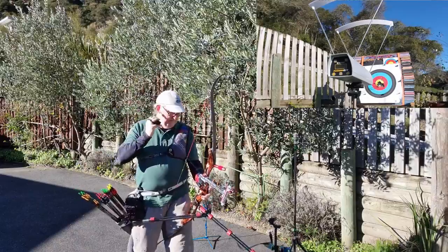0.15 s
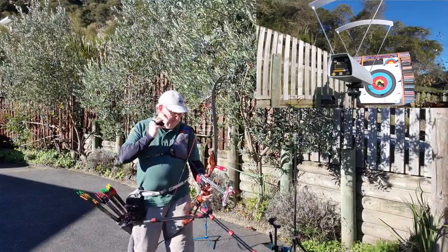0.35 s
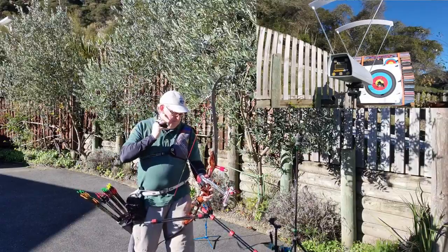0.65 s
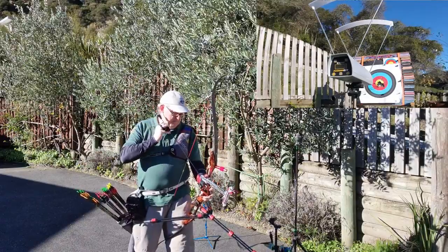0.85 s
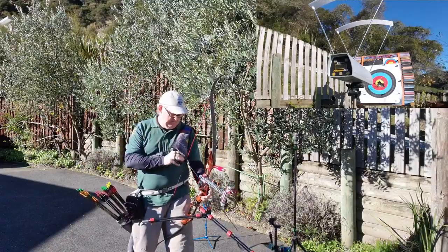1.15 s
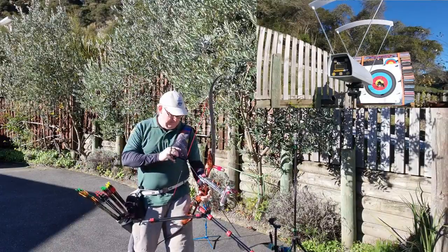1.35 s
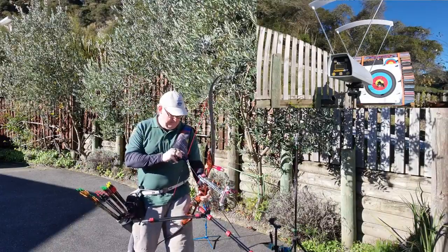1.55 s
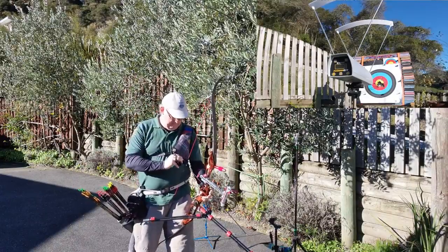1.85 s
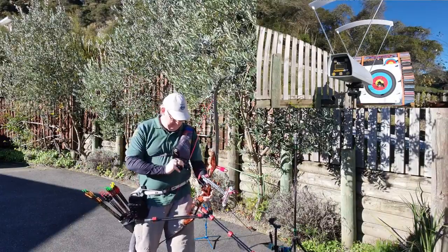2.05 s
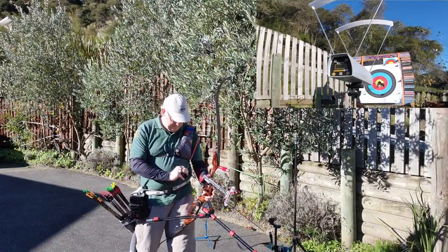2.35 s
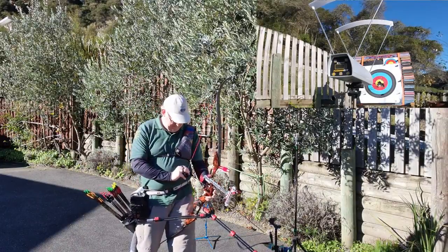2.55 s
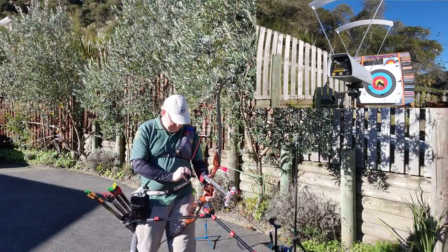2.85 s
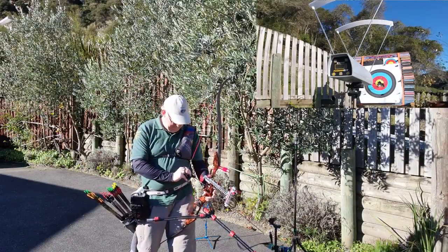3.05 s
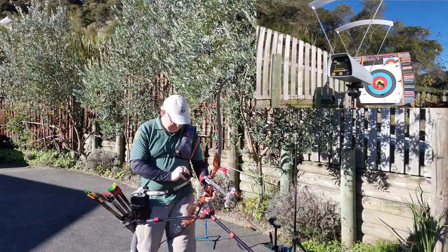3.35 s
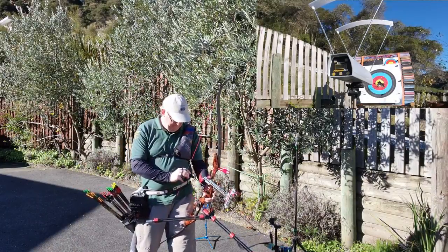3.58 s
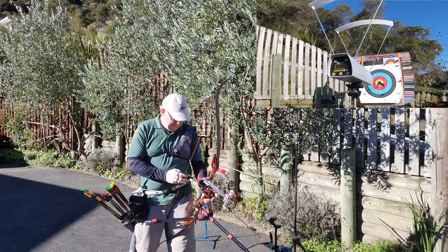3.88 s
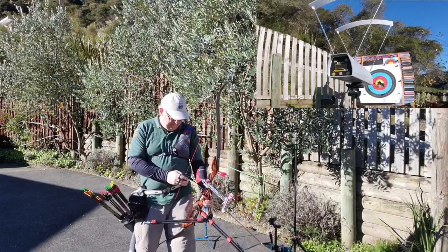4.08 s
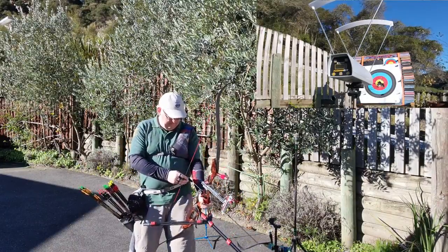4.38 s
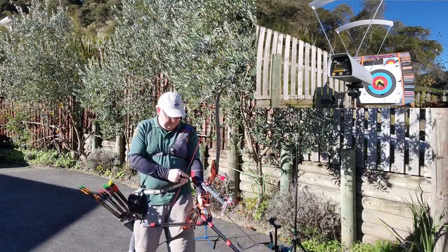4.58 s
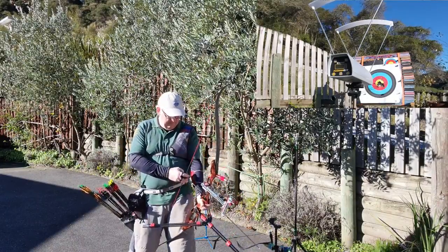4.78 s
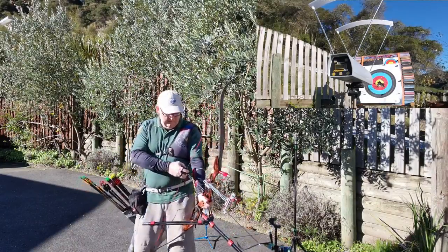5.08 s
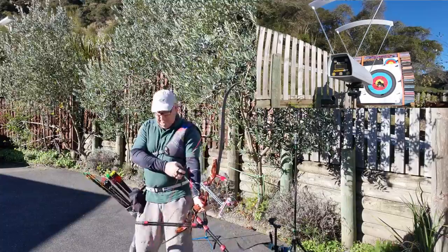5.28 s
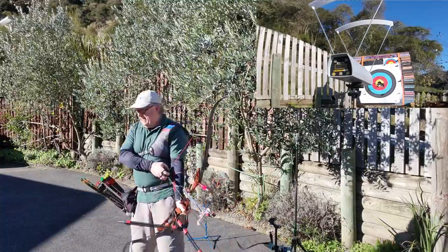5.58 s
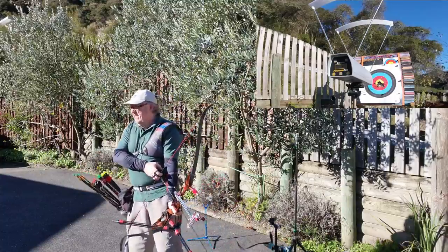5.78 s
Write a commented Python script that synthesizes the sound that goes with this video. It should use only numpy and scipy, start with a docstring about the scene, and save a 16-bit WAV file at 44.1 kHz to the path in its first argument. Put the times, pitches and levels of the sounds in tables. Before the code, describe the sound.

Low wind gusts thump against the microphone for the first second, dying down by about 1.6 seconds. From 0.4 to 1.4 seconds an arrow taps lightly against a bow, most clearly at 0.6 seconds. Between 0.8 and 1.3 seconds it slides over its rest with a fine scrape and thin, high squeaks. A quiet stretch follows. At 3.3 seconds the arrow snaps onto the string with one sharp click, the loudest moment, and the bow rings briefly. A tiny tap comes near 3.9 seconds. Around 5 seconds the bow rubs and bumps the quiver with a short hollow rattle, followed by light gear knocks and faint sleeve rustle until about 5.8 seconds. Soft outdoor air, a faint high insect hiss and a distant low engine hum continue throughout. Far birds whistle thinly near 1.5 seconds, between 3.5 and 4.3, and at 5.8.

```python
"""Loading a bow in a fenced driveway.

An arrow taps the bow, then slides over its rest with thin stick-slip squeaks. The nock snaps onto
the string and the bow rings. Sleeves rustle and gear knocks softly as the archer shifts his grip.
Gusts buffet the microphone, insects hiss in the trees, a far engine hums and far birds whistle."""
import sys
import numpy as np
from scipy import signal
from scipy.fft import rfft, irfft, next_fast_len
from scipy.io import wavfile
from scipy.ndimage import map_coordinates

SR = 44100
rng = np.random.default_rng(int(sys.argv[2]) if len(sys.argv) > 2 else 0)


def put_to_file(sound):
    """Save the sound as 16-bit audio at rate SR, in the file named by the first command-line argument."""
    columns = np.atleast_2d(sound).T  # one column per channel
    safe = np.clip(columns, -1, 1)
    whole_steps = np.round(safe * 32767)
    wavfile.write(sys.argv[1], SR, whole_steps.astype(np.int16))


N = 261072

# outdoor air spectrum: (frequency [Hz], gain [dB])
AIR_COLOUR = [(100, 4), (180, -3), (290, -3), (390, 2), (550, -2.5), (1000, -5.5), (2000, -12.5),
              (3700, -16), (4300, -22), (6000, -26), (10000, -30.5), (15500, -30.5)]
# stereo image of the air: (frequency [Hz], left-right correlation [1])
AIR_CORRELATION = [(150, 0.72), (400, 0.4), (1000, 0), (3000, 0), (8000, 0)]
# insect chorus spectrum: (frequency [Hz], gain [dB])
INSECT_COLOUR = [(5000, -65), (6100, -16.5), (6600, -1.5), (7300, 2.5), (7800, -1.5), (8300, -12.5),
                 (9000, -15.5), (10000, -45)]
# engine tones: (frequency [Hz], level [dB])
ENGINE_TONES = [(67.5, -59), (100, -57.5), (121, -68.5)]
# eddy spectrum: (frequency [Hz], gain [dB])
WIND_COLOUR = [(12, -58), (20, -0.5), (43, 2.5), (70, 5.5), (99, -6), (115, -14.5), (140, -29.5),
               (188, -40.5), (231, -37), (260, -41), (340, -82), (570, -120)]
# gusts: (time [s], length [s], level [dB], left minus right [dB])
GUSTS = [(0.023, 0.091, -29, -0.5), (0.417, 0.062, -33.5, 7), (0.623, 0.073, -25.5, -5.5),
         (0.657, 0.12, -33.5, 2.5), (0.776, 0.066, -26, -5.5), (0.829, 0.045, -23.5, -10),
         (0.891, 0.0824, -32, -3), (2.239, 0.092, -48.5, 11), (2.39, 0.22, -47.5, 1), (2.875, 0.25, -50, 1),
         (3.633, 0.088, -49, 2), (5.028, 0.4, -53, 5)]
# reverberation of the yard: (frequency [Hz], t60 [s])
YARD_DECAY = [(200, 0.256), (1000, 0.094), (3000, .15), (10000, 0.14)]
# arrow taps: (time [s], relative level [dB], top edge [Hz], t60 [s])
TAPS = [(0.425, -45.5, 15000, 0.01), (0.6231, -31.5, 10500, 0.017), (0.627, -29, 2600, 0.017),
        (0.809, -44, 11000, .05), (0.961, -41, 15000, 0.057), (0.968, -37, 9000, 0.046),
        (1.168, -39.5, 12000, .05), (1.2641, -36, 3140, .045), (1.286, -46, 14000, .028),
        (1.369, -46, 14000, 0.03), (3.926, -47, 13000, .03), (5.776, -46, 6500, 0.033)]
# tap spectrum: (frequency [Hz], gain [dB])
TAP_COLOUR = [(300, -17), (700, -17), (1150, -16.5), (1500, -3.5), (1750, -9), (2200, 3), (2650, -14),
              (3000, -5), (4200, -3), (5100, -3.5), (7000, -3.5), (9000, -9), (15500, -16)]
# arrow shaft modes: (frequency [Hz], width [Hz], gain [dB])
SHAFT_MODES = [(1500, 150, -6.5), (2206, 140, 0.5), (2985, 57, -5), (3570, 28, -11), (4970, 28, 1),
               (5700, 89, -21), (9020, 87, -26), (10000, 31, -31)]
# pushes of the shaft over the rest: (time [s], length [s], level [dB])
PUSHES = [(.755, 0.26, -69), (.99, 0.336, -57.5)]
# scrape spectrum: (frequency [Hz], gain [dB])
SCRAPE_COLOUR = [(530, -36), (900, -13), (1520, -7.5), (2200, -9), (2510, -9.5), (2930, -8.5), (3340, -9),
                 (4280, -5), (5310, -7.5), (7680, -14.5), (15500, -17)]
# stick-slip squeaks: (time [s], length [s], start pitch [Hz], end pitch [Hz], level [dB])
SQUEAKS = [(0.772, 0.14, 2055, 2150, -64), (0.81, 0.055, 3030, 2950, -60.5), (0.87, 0.039, 3770, 4230, -52),
           (0.888, .04, 4160, 5700, -62.5), (0.952, 0.0266, 6966, 7260, -50.5),
           (1.018, .035, 5800, 4430, -59), (1.033, 0.044, 4380, 4160, -48.5),
           (1.065, 0.1, 4710, 4980, -56.5), (1.161, 0.019, 4450, 4180, -42), (1.17, 0.03, 4480, 4970, -55),
           (1.165, 0.052, 2200, 2350, -52), (1.166, .028, 1640, 1750, -56),
           (1.221, 0.0226, 4460, 4700, -45)]
# bird whistles: (time [s], length [s], start pitch [Hz], level [dB])
WHISTLES = [(1.47, 0.092, 3650, -65), (3.503, 0.067, 3830, -77), (3.64, 0.077, 3780, -77),
            (4.0, 0.15, 2560, -77), (4.168, 0.11, 2510, -71), (5.82, 0.23, 2490, -66)]
# faint soft tick just before the snap, then the nock's contacts on the string:
# (time [s], level [dB], top edge [Hz])
SNAPS = [(3.3141, -41.5, 7000), (3.3184, -30, 15000), (3.3197, -22.5, 7700), (3.3225, -24, 2020),
         (3.3231, -29, 12500)]
# snap spectrum: (frequency [Hz], gain [dB])
SNAP_COLOUR = [(200, -25.5), (480, -3), (750, -11), (1200, 5.5), (1500, -4.5), (2000, 5), (2600, 0),
               (3400, -3.5), (4500, 2), (5900, -9), (8000, -5), (10500, -6), (15500, -24)]
# modes of the strung bow with its arrow: (frequency [Hz], relative level [dB], t60 [s])
BOW_MODES = [(458, -18.5, 0.44), (651, -14, 0.3), (800, -21, 0.18), (875, -29, 0.3), (900, -35, 0.18),
             (1124, -19.5, .28), (1350, -23, 0.22), (1410, -15, 0.14), (1530, -20, 0.08), (1620, 0, 0.094),
             (1740, -1, 0.069), (1880, -11, 0.073), (2086, 0, 0.069), (2250, -11, 0.063), (2395, -19, 0.12),
             (2697, -25.5, .12), (2920, -8.5, 0.086), (3750, -30, .12), (4370, -11, 0.065),
             (4800, -26, 0.065), (4945, -23, 0.071)]
# sleeve movements: (time [s], length [s], level [dB])
SLEEVE_MOVES = [(4.875, .42, -63), (5.2, 0.64, -72.5), (5.748, 0.083, -56.5)]
# cloth spectrum: (frequency [Hz], gain [dB])
CLOTH_COLOUR = [(200, -7), (700, 0), (1500, 2), (2500, -7.5), (3800, -12), (5300, -8.5), (8000, -19),
                (15000, -35)]
# bow rubbing along the quiver: (time [s], length [s], level [dB])
QUIVER_RUB = (4.975, .17, -60.5)
# hollow quiver modes: (frequency [Hz], width [Hz], gain [dB])
QUIVER_MODES = [(694, 78, -7), (840, 110, 5), (1400, 37, 1), (2090, 500, -2.5)]
# knock spectrum: (frequency [Hz], gain [dB])
KNOCK_COLOUR = [(200, -24), (400, -6), (680, 1), (1050, -3), (1400, -1.5), (1800, -6), (2300, -5.5),
                (2900, -16), (4000, -14), (8000, -40)]
# light gear knocks: (time [s], level [dB])
KNOCKS = [(5.252, -53), (5.480, -50.5), (5.560, -48), (5.621, -53.5), (5.6727, -42), (5.686, -47.5)]

TOP_HZ, ARROW_PAN_DB = 15750, 2.3


def amp(db):
    return 10 ** (np.asarray(db) / 20)


def unit_rms(x):
    return x / np.sqrt(np.mean(x ** 2) + 1e-20)


def along(points, hz):
    """Interpolate (frequency [Hz], value) points on a log axis; one point gives a constant."""
    knots_hz, values = np.transpose(points)
    return np.interp(np.log(hz + 1), np.log(knots_hz + 1), values)


def wobble(rate_hz):
    """Smooth random curve with knots at rate_hz."""
    knots = rng.standard_normal(int(N * rate_hz / SR) + 4)
    return map_coordinates(knots, [np.arange(N) * rate_hz / SR])


def swell(length_s):
    """Half-sine rise and fall."""
    return np.sin(np.linspace(0, np.pi, int(length_s * SR)))


def strokes(rows, attack_s, release_s):
    """Gain of movements that gather speed, hold and slow down."""
    t = np.arange(N) / SR
    return sum(amp(db) * np.clip(np.minimum((t - s) / attack_s, (s + length_s - t) / release_s), 0, 1)
               for s, length_s, db in rows)


def add(track, start_s, sound):
    part = track[..., round(start_s * SR):][..., :sound.shape[-1]]
    part += sound[..., :part.shape[-1]]


def filtered(x, response):
    """Apply a frequency response by padded FFT."""
    n = x.shape[-1]
    padded = next_fast_len(n + 8192)
    return irfft(rfft(x, padded) * response(np.fft.rfftfreq(padded, 1 / SR)), padded)[..., :n]


def resonances(modes):
    """Frequency response of a body: band-pass modes of alternating sign."""
    return lambda hz: sum((-1) ** k * amp(db) * 1j * hz * width / (centre**2 - hz**2 + 1j * hz * width)
                          for k, (centre, width, db) in enumerate(modes))


def noise(colour, correlation):
    """Stereo noise of rms 1; spectrum and left-right correlation given over frequency."""
    def response(hz):
        angle = np.arccos(np.clip(along(correlation, hz), -1, 1)) / 2
        return amp(along(colour, hz)) * [np.cos(angle), np.sin(angle)]
    mid, side = filtered(rng.standard_normal((2, N)), response)
    return unit_rms(np.array([mid + side, mid - side]))


def air(level_db=-60):
    """Soft, steady outdoor air."""
    return amp(level_db) * noise(AIR_COLOUR, AIR_CORRELATION)


def insects():
    """A chorus merges into a narrow, faintly flickering hiss."""
    level_db = -64 + 0.32 * wobble(4.2) + 0.45 * wobble(60)
    return amp(level_db) * noise(INSECT_COLOUR, [(7000, 0.02)]) * amp([[1.1], [-1.1]])


def engine():
    """Far hum: low tones wander in level and phase."""
    t = np.arange(N) / SR
    out = np.zeros(N)
    for hz, db in ENGINE_TONES:
        peak = np.sqrt(2) * amp(db + 1.6 * wobble(4.07))
        out += peak * np.sin(2 * np.pi * hz * t + 0.41 * wobble(3.05))
    return out


def wind(breeze_db=-41.5, calm_db=-62, lull_s=1.05, fall_s=0.59):
    """Eddies thump each microphone port separately, over a breeze that dies down."""
    level_db = np.interp(np.arange(N) / SR, [lull_s, lull_s + fall_s], [breeze_db, calm_db])
    out = amp(level_db) * noise(WIND_COLOUR, [(50, 0.017)]) * amp([[1.2], [-1.2]])
    eddies = noise(WIND_COLOUR, [(50, -0.11)])
    for s, length_s, db, pan_db in GUSTS:
        shape = swell(length_s)
        eddy = eddies[:, round(s * SR):][:, :len(shape)] * shape * amp([[pan_db / 2], [-pan_db / 2]])
        add(out, s, amp(db) * unit_rms(eddy))
    return out


def contact(colour, edge_hz, t60_s, chatter, size=8192):
    """Impulse plus dying chatter, coloured; energy equals 1 ms at level 1."""
    t, hz = np.arange(size) / SR, np.fft.rfftfreq(size, 1 / SR)
    force = chatter * unit_rms(rng.standard_normal(size) * amp(-60 * t / t60_s)) / np.sqrt(size)
    force[0] += 1
    gain = amp(along(colour, hz)) / np.sqrt(1 + (hz / edge_hz) ** 6)
    # minimum phase: nothing sounds before the hit
    cepstrum = irfft(np.log(np.maximum(gain, 1e-5)))
    cepstrum[1:size // 2] *= 2
    cepstrum[size // 2 + 1:] = 0
    hit = irfft(np.exp(rfft(cepstrum)) * rfft(force))
    return unit_rms(hit) * np.sqrt(SR / 1000 / size)


def in_yard(x, pan_db, wet_db, gap_s=0.004):
    """Direct sound reaches the right port first; paving, fence and bushes scatter a short tail."""
    hz, t, spectra = signal.stft(rng.standard_normal((2, 12000)), SR, nperseg=256)
    decay = amp(-60 * t / along(YARD_DECAY, hz)[:, None])
    tail = signal.istft(spectra * decay, SR, nperseg=256)[1]
    delayed = np.pad(x, (int(gap_s * SR), 0))
    echo = signal.fftconvolve(delayed[None], tail / np.linalg.norm(tail[0]), axes=1)[:, :N]
    sides = np.array([[1], [-1]])
    port_lag_s = lambda f: 1e-4 / (1 + f / 2800)
    direct = filtered(x, lambda f: np.exp(-sides * 1j * np.pi * f * port_lag_s(f)))
    return direct * amp(sides * pan_db / 2) + amp(wet_db) * echo


def arrow_taps():
    """The arrow touches the bow; each touch rings the shaft."""
    hits = np.zeros(N)
    for s, db, edge_hz, t60_s in TAPS:
        add(hits, s, amp(db) * contact(TAP_COLOUR, edge_hz, t60_s, chatter=4.9))
    ring = filtered(hits, resonances(SHAFT_MODES))
    return in_yard(amp(-5.5) * hits + amp(-3) * ring, ARROW_PAN_DB, wet_db=-2)


def glide(length_s, from_hz, to_hz, flutter):
    """Gliding tone that swells and fades; flutter is a share of pitch."""
    shape = swell(length_s)
    pitch_hz = np.linspace(from_hz, to_hz, len(shape)) * (1 + flutter * wobble(1116)[:len(shape)])
    return shape * np.sin(2 * np.pi * np.cumsum(pitch_hz) / SR)


def arrow_slide(full_push_db=-58, ring_db=-70):
    """Grainy friction on the rest rings the shaft; stick-slip squeaks roughen with the push."""
    push = strokes(PUSHES, attack_s=0.073, release_s=0.085)
    force = push / amp(full_push_db)
    friction = unit_rms(rng.standard_normal(N) * amp(3.5 * wobble(300)))
    tube = contact(SCRAPE_COLOUR, TOP_HZ, t60_s=0.031, chatter=1.1)
    scrape = push * unit_rms(signal.fftconvolve(friction, tube)[:N])
    ring = amp(ring_db) * force ** 0.18 * unit_rms(filtered(friction, resonances(SHAFT_MODES)))
    out = scrape + ring
    for s, length_s, from_hz, to_hz, db in SQUEAKS:
        squeak = glide(length_s, from_hz, to_hz, flutter=0.022 + 0.019 * force[round(s * SR)])
        add(out, s, amp(db + 2.4 * wobble(324)[:len(squeak)]) * squeak)
    return in_yard(out, ARROW_PAN_DB, wet_db=-5.5)


def birds(pitch_sag=0.0236):
    """Thin, far whistles that waver and fall slightly."""
    out = np.zeros(N)
    for s, length_s, hz, db in WHISTLES:
        add(out, s, amp(db) * glide(length_s, hz, hz * (1 - pitch_sag), flutter=0.022))
    return in_yard(out * amp(2.8 * wobble(25.08)), pan_db=0, wet_db=-5.5)


def nock_snap(ring_db=-25, ring_attack_s=0.0098, fence_db=-14, fence_delay_s=0.0128):
    """A faint soft tick, then the nock's ears spring over the string; bow and arrow ring."""
    snap, bow = np.zeros((2, N))
    for s, db, edge_hz in SNAPS:
        add(snap, s, amp(db) * contact(SNAP_COLOUR, edge_hz, t60_s=0.0115, chatter=1.66))
    fence_echo = filtered(snap, lambda hz: 1 / (1 + (hz / 5000) ** 2))
    add(snap, fence_delay_s, amp(fence_db) * fence_echo)
    t = np.arange(SR) / SR
    ring = sum((-1) ** k * amp(db - 60 * t / t60_s) * np.sin(2 * np.pi * hz * t)
               for k, (hz, db, t60_s) in enumerate(BOW_MODES))
    add(bow, SNAPS[1][0], amp(ring_db) * ring * (1 - np.exp(-t / ring_attack_s)))
    return in_yard(snap, ARROW_PAN_DB, wet_db=-9) + in_yard(bow, pan_db=0.5, wet_db=-13)


def sleeves():
    """Cloth rustles faintly as the archer turns."""
    cloth = noise(CLOTH_COLOUR, [(1000, 0.16)])
    folds_db = 1.5 * wobble(90)
    speed = np.zeros(N)
    for s, length_s, db in SLEEVE_MOVES:
        add(speed, s, amp(db) * swell(length_s))
    return cloth * speed * amp(folds_db)


def quiver_rub(edge_hz=1600):
    """The bow rubs the quiver: dull friction through its hollow modes."""
    body = resonances(QUIVER_MODES)
    friction = filtered(rng.standard_normal(N), lambda hz: body(hz) / (1 + (hz / edge_hz) ** 4))
    return strokes([QUIVER_RUB], attack_s=0.022, release_s=0.03) * unit_rms(friction)


def knock(edge_hz, t60_s, hollow_db):
    """One blow on the gear plus the quiver's hollow ring."""
    blow = contact(KNOCK_COLOUR, edge_hz, t60_s, chatter=1.6)
    return blow + amp(hollow_db) * filtered(blow, resonances(QUIVER_MODES))


def grip_shift(bump_s=5.0856, bump_db=-34.5, rattle_gap_s=0.0135, rattle_db=-43, loss_db=3):
    """The bow rubs and bumps the quiver, which rattles against it; light knocks follow."""
    out = quiver_rub()
    add(out, bump_s, amp(bump_db) * knock(edge_hz=1710, t60_s=0.0092, hollow_db=10))
    for k in range(4):
        rebound = knock(edge_hz=2600, t60_s=0.035, hollow_db=10)
        add(out, bump_s + (k + 1) * rattle_gap_s, amp(rattle_db - k * loss_db) * rebound)
    for s, db in KNOCKS:
        add(out, s, amp(db) * knock(edge_hz=2340, t60_s=0.012, hollow_db=-15))
    return in_yard(out, pan_db=-0.5, wet_db=-4)


def scene():
    archer = nock_snap() + arrow_taps() + grip_shift() + arrow_slide() + sleeves()
    return archer + wind() + air() + insects() + engine() + birds()


def record(dry):
    """Brick-wall low-pass at TOP_HZ."""
    return filtered(dry, lambda hz: hz < TOP_HZ)


dry = scene()
out = record(dry)
put_to_file(out)
```